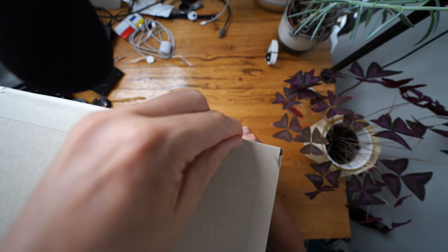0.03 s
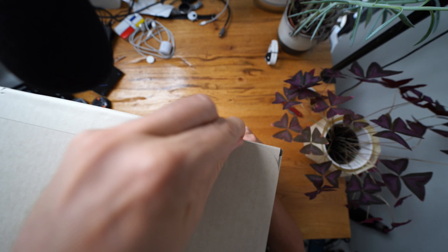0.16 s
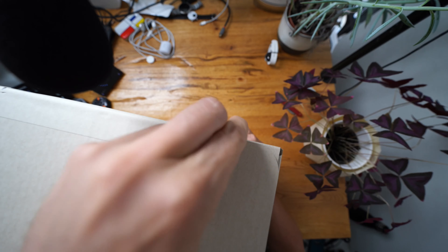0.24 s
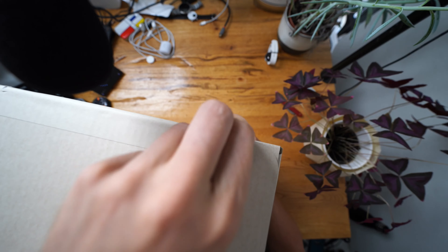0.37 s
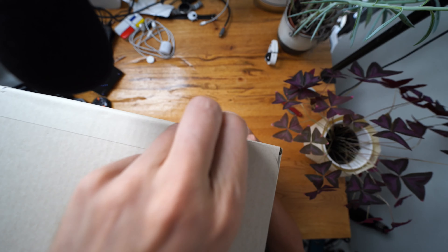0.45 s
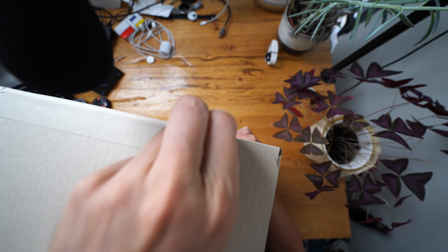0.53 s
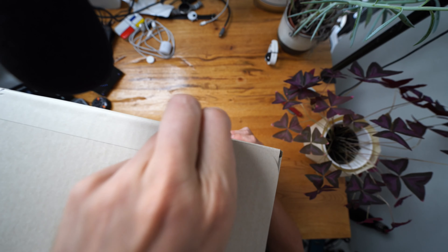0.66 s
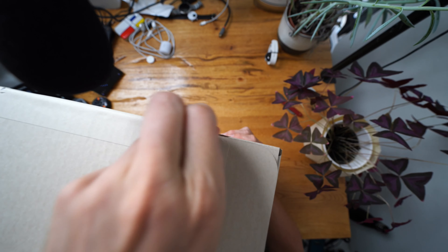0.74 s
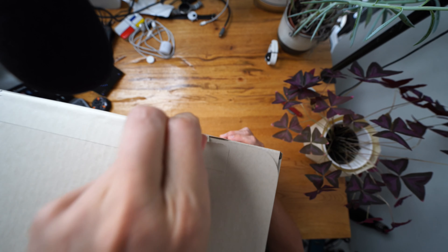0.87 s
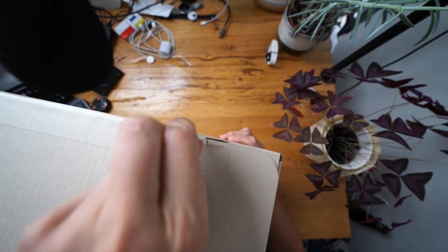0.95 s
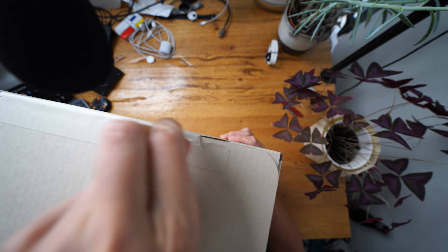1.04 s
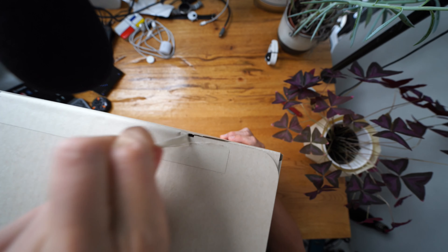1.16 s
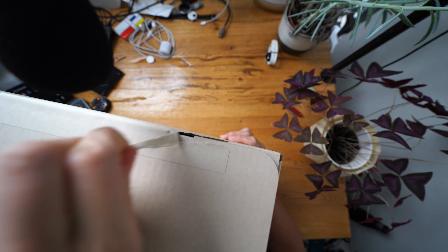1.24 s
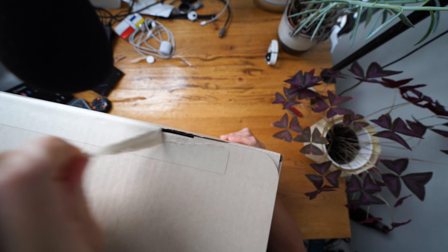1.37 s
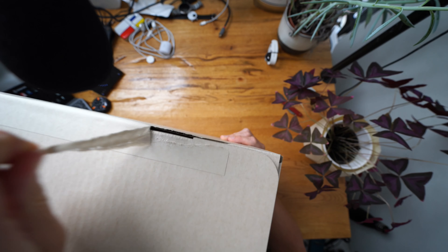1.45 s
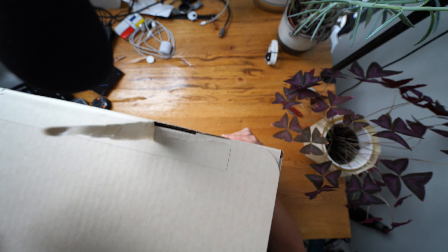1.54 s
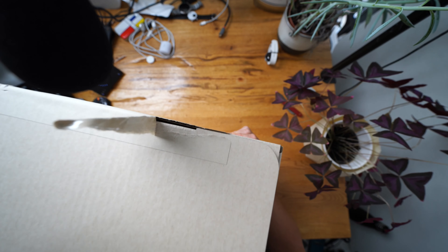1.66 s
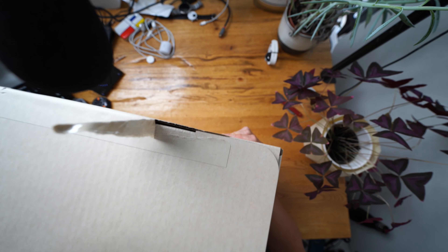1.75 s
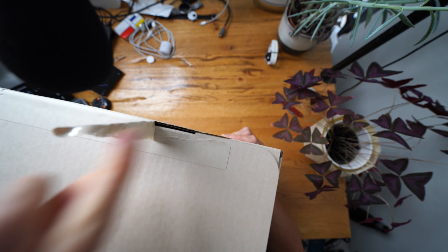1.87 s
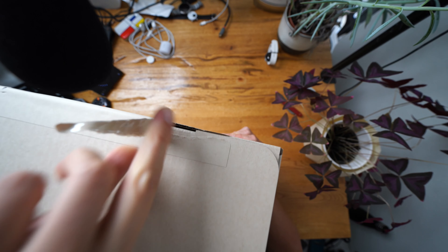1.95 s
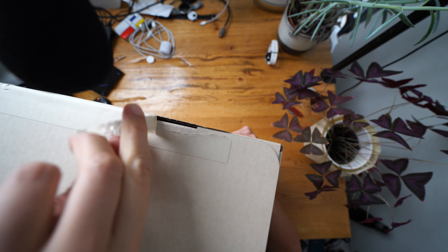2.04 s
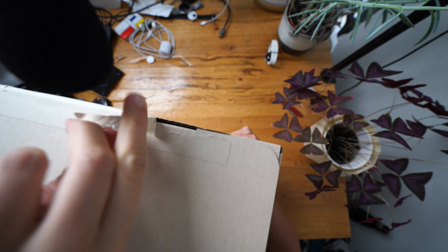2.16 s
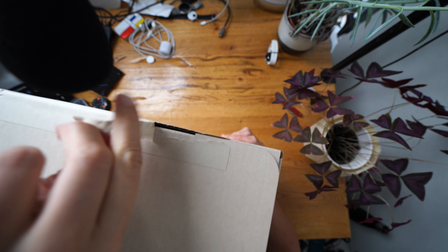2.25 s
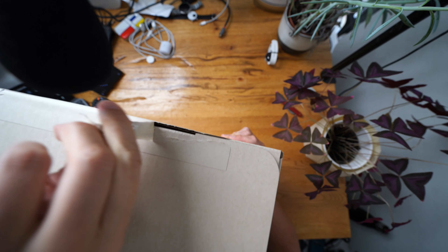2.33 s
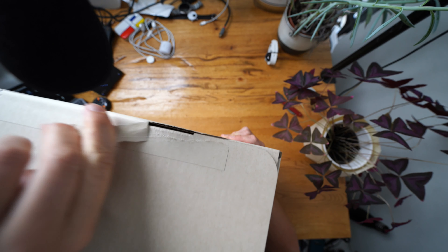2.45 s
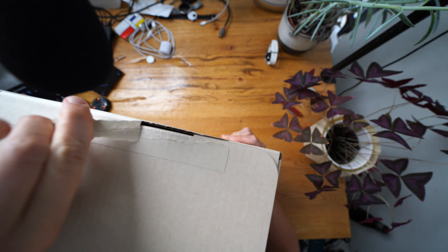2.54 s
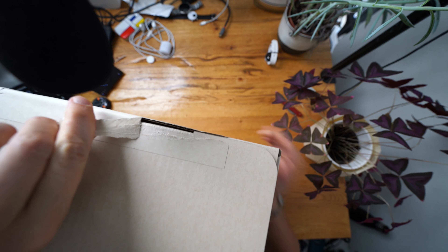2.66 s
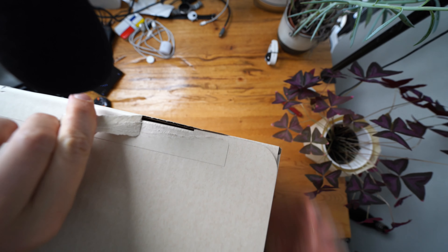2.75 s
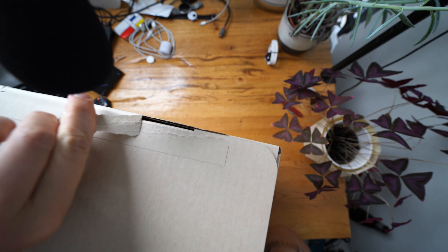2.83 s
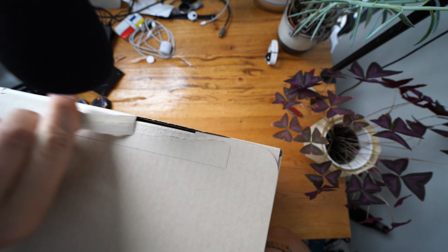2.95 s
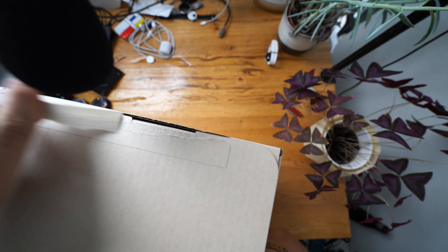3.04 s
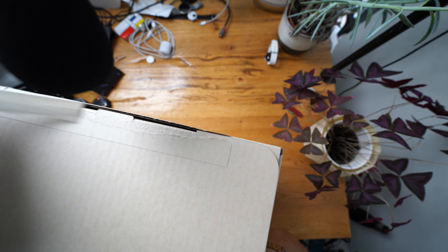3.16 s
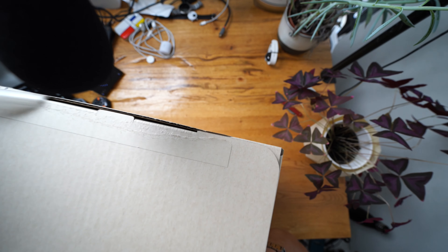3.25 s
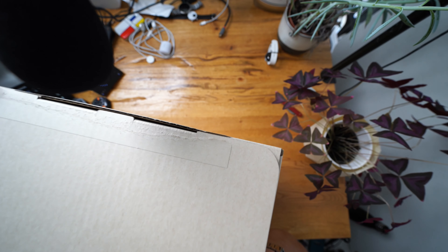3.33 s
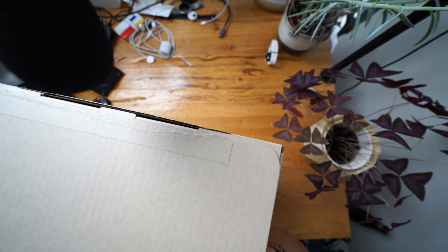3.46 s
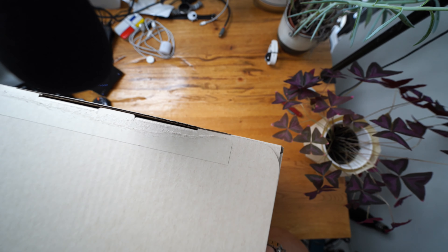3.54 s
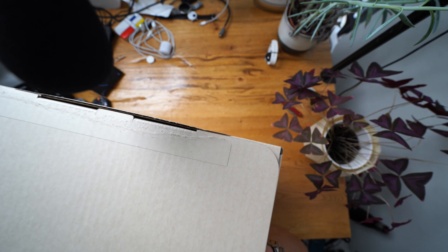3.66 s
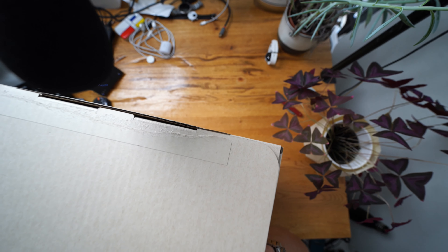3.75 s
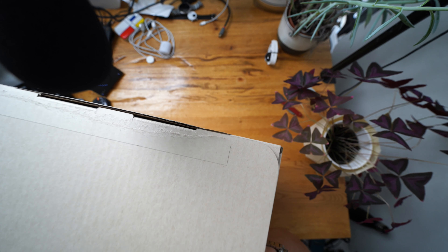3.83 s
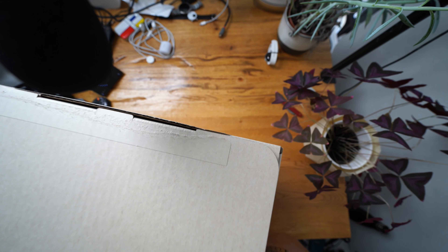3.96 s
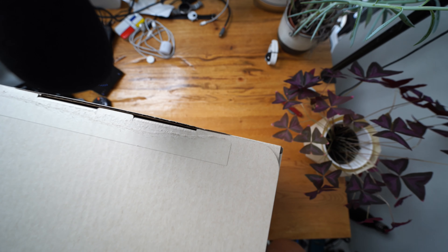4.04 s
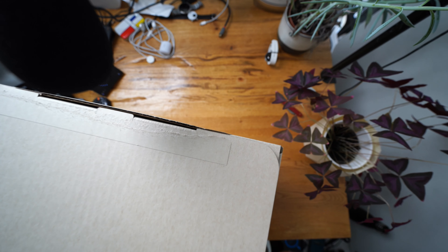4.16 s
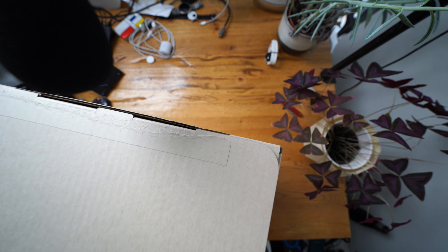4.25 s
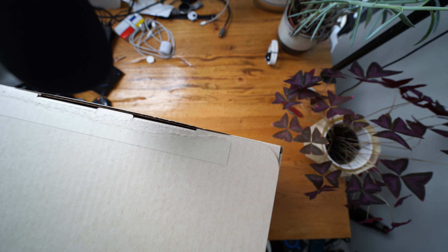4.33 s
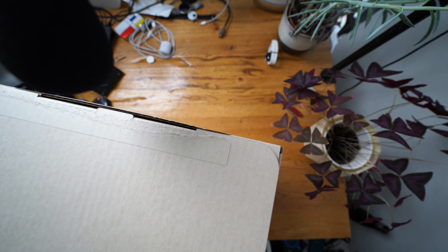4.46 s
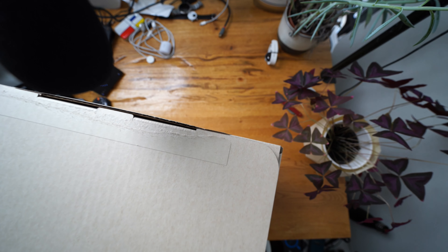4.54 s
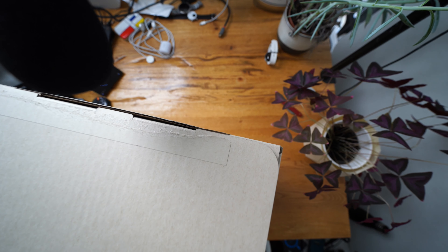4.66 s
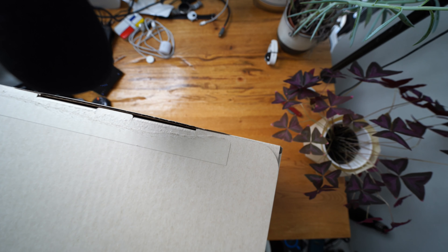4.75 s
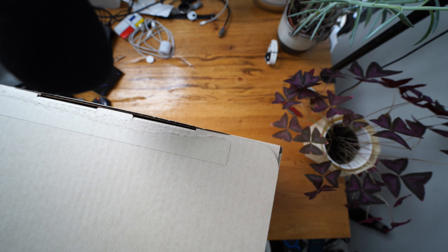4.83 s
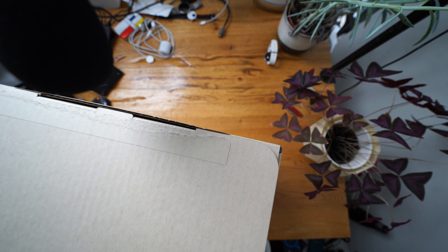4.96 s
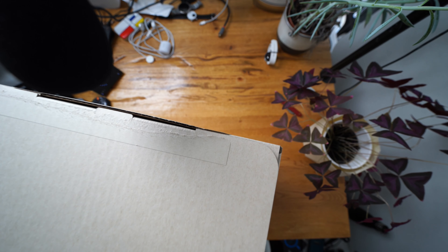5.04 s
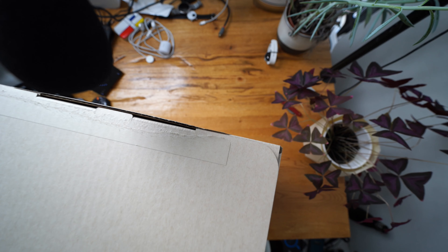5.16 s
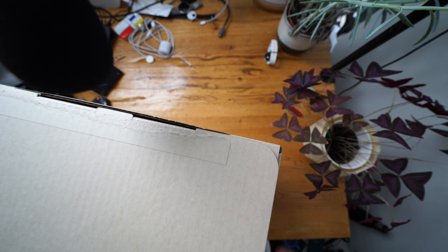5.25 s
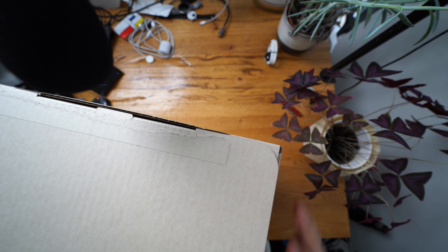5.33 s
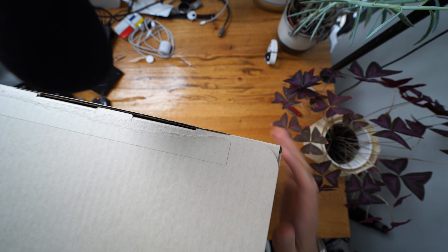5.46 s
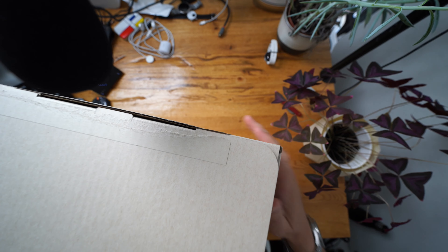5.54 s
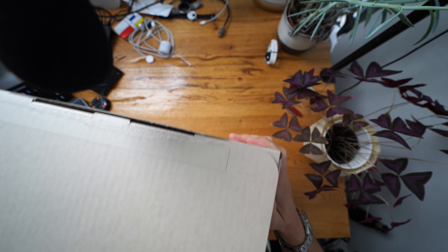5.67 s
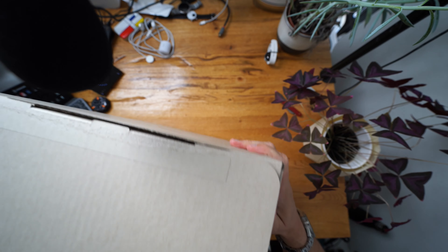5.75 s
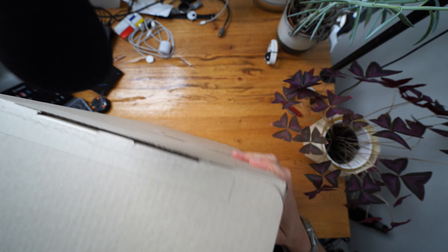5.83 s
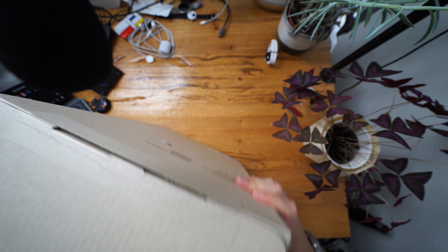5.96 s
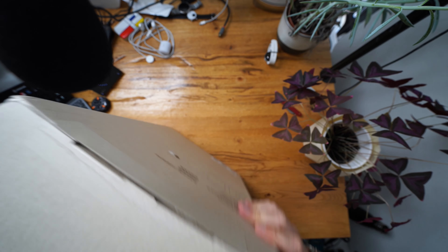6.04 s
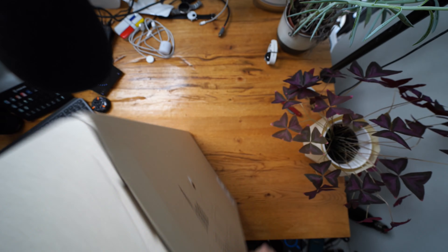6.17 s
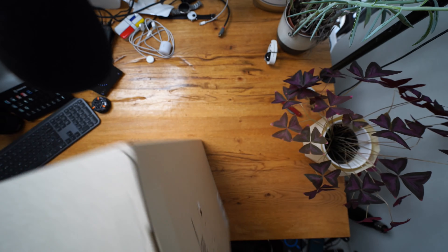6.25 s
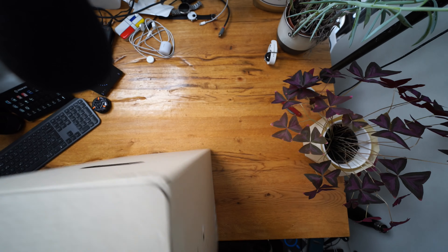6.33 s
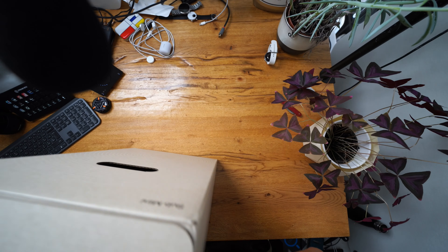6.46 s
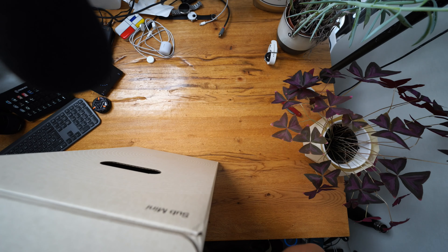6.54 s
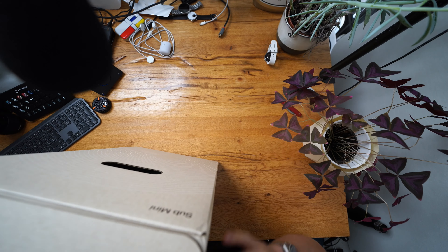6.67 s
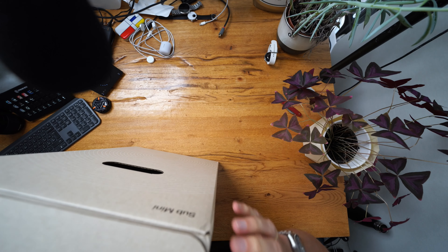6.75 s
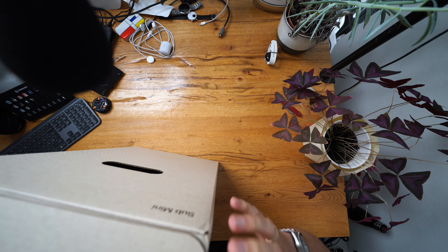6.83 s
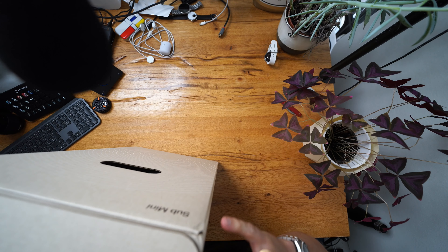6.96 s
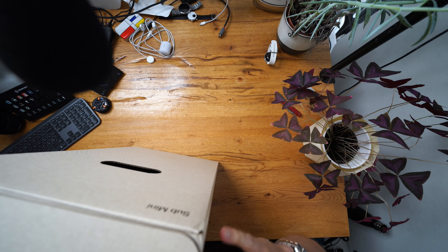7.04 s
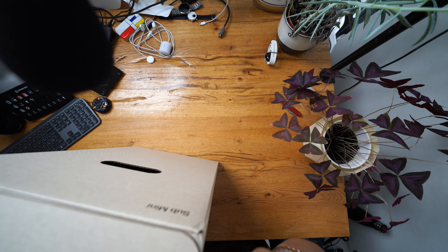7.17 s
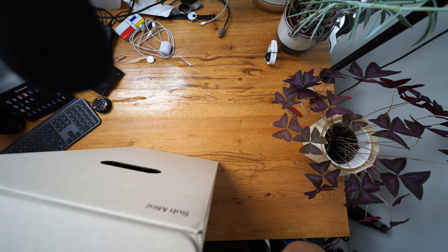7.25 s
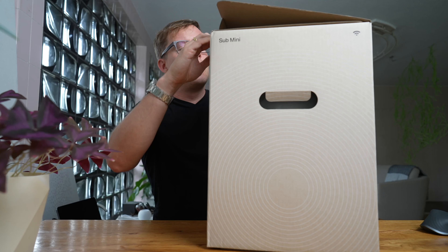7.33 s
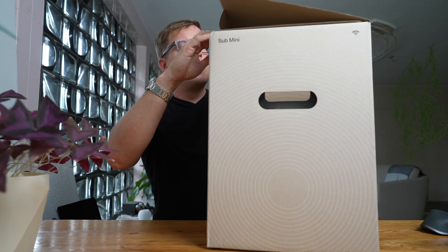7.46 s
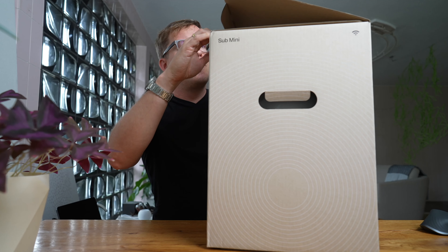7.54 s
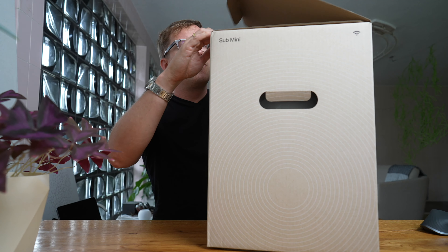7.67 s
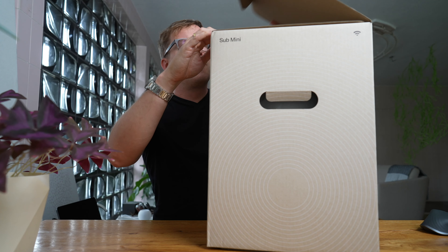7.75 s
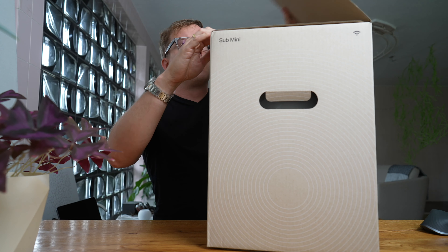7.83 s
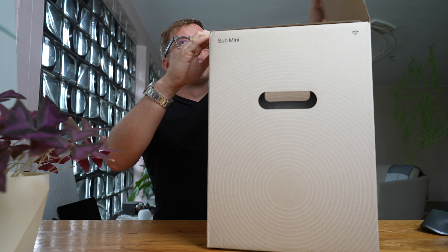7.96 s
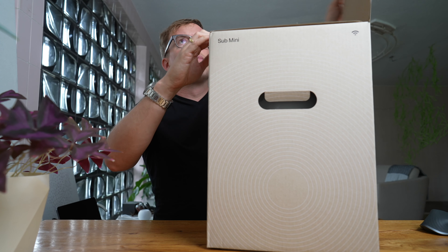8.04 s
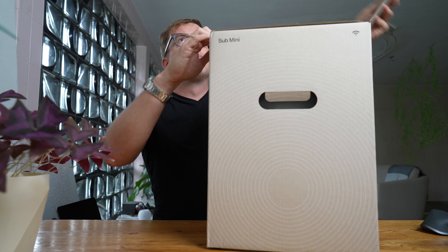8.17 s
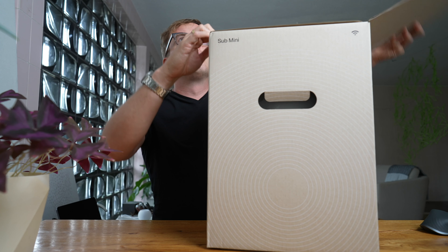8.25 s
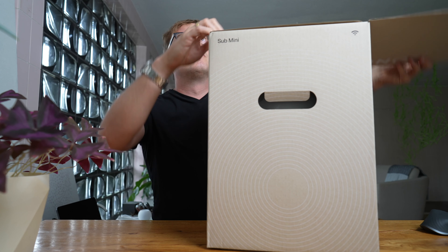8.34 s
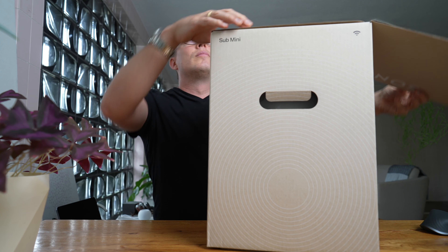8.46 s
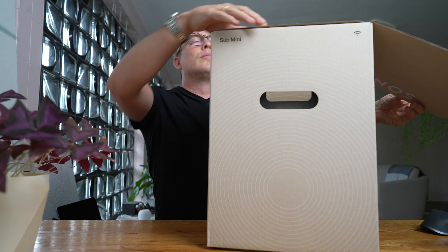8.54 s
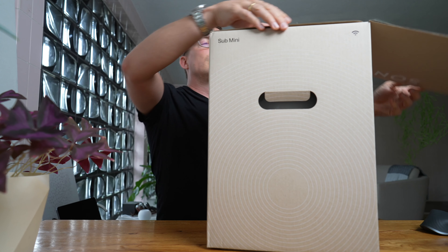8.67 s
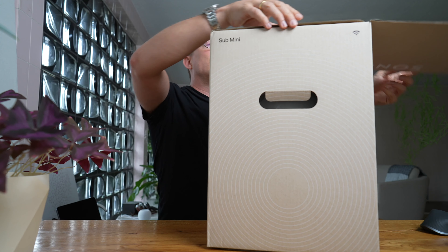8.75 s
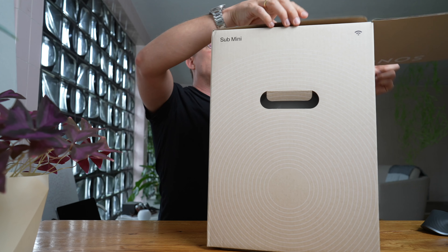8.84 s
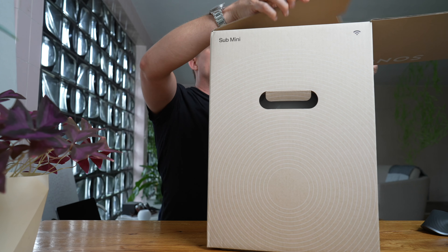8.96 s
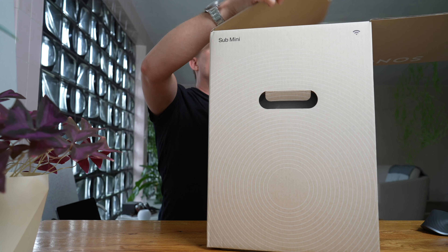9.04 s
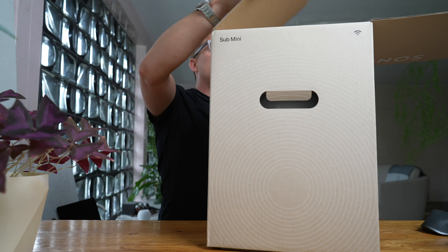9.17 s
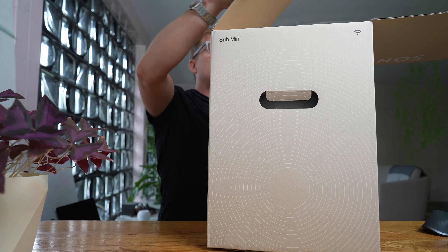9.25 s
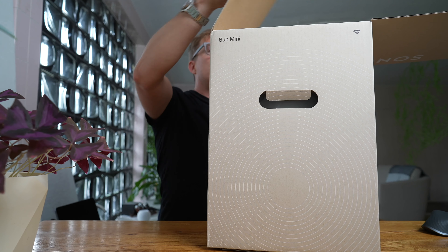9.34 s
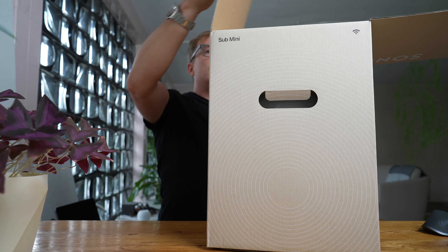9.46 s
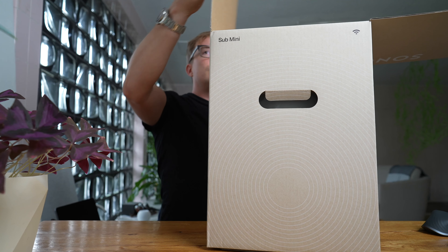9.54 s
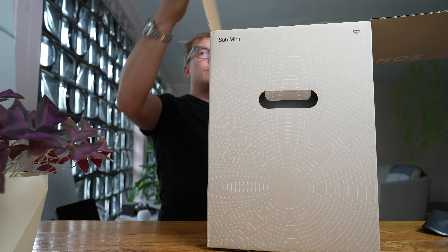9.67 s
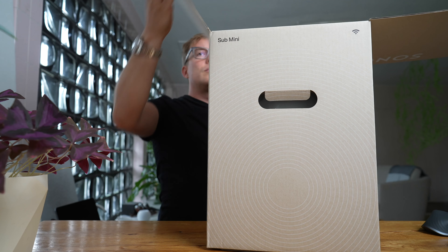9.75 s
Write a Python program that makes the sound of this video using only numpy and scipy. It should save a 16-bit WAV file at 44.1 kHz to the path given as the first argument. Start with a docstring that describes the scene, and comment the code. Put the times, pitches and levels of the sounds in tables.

```python
"""Hands rub and peel at the tear strip of a large cardboard box on a table, close by; then they rip it out.
The strip is dropped some way off. The box is slid round, its lid pops free and hands brush the flaps open.
Rubbing and tearing are showers of random fibre slips, coloured by the board and shaped by the hands' levels.
Snaps, knocks and thumps are damped swings with short bursts; edges, lid, table and landing ring as
resonant noise and decaying modes. A faint room answers the sounds over a steady low murmur."""
import sys
import numpy as np
from scipy import signal
from scipy.fft import rfft, irfft, next_fast_len
from scipy.io import wavfile
from scipy.ndimage import uniform_filter1d, map_coordinates

SR = 44100
rng = np.random.default_rng(int(sys.argv[2]) if len(sys.argv) > 2 else 0)


def unload_wav(signal):
    """Save mono or channel-first audio to the path in sys.argv[1] as 16-bit WAV at rate SR, clipped to [-1, 1]."""
    wavfile.write(
        sys.argv[1],
        SR,
        np.round(np.clip(np.atleast_2d(signal).T, -1, 1) * 32767).astype(np.int16),
    )


N = 432180  # samples, 9.8 s


def amp(db):
    """Amplitude factor of a level in dB."""
    return 10 ** (np.asarray(db) / 20)


def unit(x):
    """x at an RMS of 1."""
    return x / np.sqrt(np.mean(x ** 2) + 1e-20)


def crest(x):
    """x with an envelope peak of 1."""
    return x / np.abs(signal.hilbert(x)).max()


def along(points, hz):
    """Read (Hz, value) points at hz on a log axis."""
    f, v = np.transpose(points)
    return np.interp(np.log(hz + 1), np.log(f + 1), v)


def wobble(rate, size):
    """A smooth random curve with rate knots a second."""
    knots = rng.standard_normal(int(size * rate / SR) + 4)
    return map_coordinates(knots, [np.arange(size) * rate / SR])


def filtered(x, response):
    """x times a response of frequency."""
    m = next_fast_len(len(x) + 8192)
    return irfft(rfft(x, m) * response(np.fft.rfftfreq(m, 1 / SR)), m)[:len(x)]


def band(x, lo_hz, hi_hz, order=2):
    """Causal band-pass."""
    edges_hz = [lo_hz, min(hi_hz, SR / 2 - 100)]
    return signal.sosfilt(signal.butter(order, edges_hz, "band", fs=SR, output="sos"), x)


def below(hz, edge_hz, order=6):
    """Gain of a smooth low-pass."""
    return 1 / (1 + (hz / edge_hz) ** order)


def resonances(modes, hz):
    """Causal response of (Hz, width Hz, dB) modes, alternating in sign."""
    return sum((-1) ** k * amp(db) * 1j * hz * w / (c * c - hz * hz + 1j * hz * w)
               for k, (c, w, db) in enumerate(modes))


def causal(points, size=4096):
    """Minimum-phase impulse response, abrupt at its start, with the gain of (Hz, dB) points."""
    cepstrum = irfft(np.log(amp(along(points, np.fft.rfftfreq(size, 1 / SR)))))
    cepstrum[1:size // 2] *= 2
    cepstrum[size // 2 + 1:] = 0
    return irfft(np.exp(rfft(cepstrum)))


def add(track, s, x):
    """Mix x into the track from time s on."""
    part = track[max(round(s * SR), 0):][:len(x)]
    part += x[:len(part)]


def fading(t, t60):
    """Noise that dies by 60 dB in t60 seconds."""
    return rng.standard_normal(len(t)) * amp(-60 * t / t60)


# Long pulls on the strip, peeling then ripping: time_s, body_db, rasp_db, hiss_db
PEEL_PULL = [(1.055, -38, -43.5, -25.5), (1.351, -41.5, -37.5, -23.5), (1.357, -39.5, -41, -27),
             (1.405, -34.5, -33, -26), (1.419, -32.5, -40.5, -26.5), (1.447, -30, -33.5, -22.5),
             (1.467, -27.5, -40, -28), (1.481, -25, -34, -24), (1.495, -31, -42, -34)]
RIP_PULL = [(2.945, -44, -46.5, -40), (2.965, -30, -37, -25.5), (3.099, -17.5, -26.5, -22),
            (3.173, -21.5, -21.5, -21.5), (3.183, -22.5, -27.5, -23), (3.353, -29.5, -37, -26.5),
            (3.367, -24, -28, -23), (3.391, -32.5, -54.5, -43.5), (3.41, -51, -47, -46)]
# Tone of the board while it peels and rips: freq_hz, relative_density_db (per Hz)
PEEL_COLOUR = [(18, -27), (30, 7.5), (55, 14), (102, -6), (152, 0), (284, -7.5), (500, -8.5), (700, -16.5),
               (1870, -12), (2240, -16.5), (2700, -19), (3400, -20.5), (4300, -24.5), (5800, -23),
               (9190, -19), (13600, -24), (15500, -26.5)]
RIP_COLOUR = [(18, -46), (30, -5.5), (60, 10), (102, 11.5), (237, -1), (432, -10), (492, -9), (787, -16),
              (970, -21), (1400, -19.5), (2070, -24.5), (3490, -29.5), (8500, -24.5), (14000, -29),
              (15500, -39.5)]


def tearing():
    """The strip peels up and rips through the liner: sparse, uneven fibre breaks."""
    peeling = hands((0, 1.96), PEEL_PULL, boom_db=10.5, rasp_db=-4.5)
    ripping = hands((1.96, 4.15), RIP_PULL, boom_db=4.0, rasp_db=-7.5)
    peel = stroke(peeling, PEEL_COLOUR, slips_per_s=3600, spread_db=5.5, smooth_db=-3,
                  catch_rate=130, catch_db=1.9, patchy_db=2.4, breaks_db=-8)
    rip = stroke(ripping, RIP_COLOUR, slips_per_s=4500, spread_db=3.0, smooth_db=0.5,
                 catch_rate=74, catch_db=1.52, patchy_db=0.95, breaks_db=-9.5)
    return peel + rip


# The long slide of the box: time_s, body_db, rasp_db, hiss_db
SLIDE_PULL = [(5.77, -46, -56, -58), (5.848, -44.5, -50, -49.5), (6.25, -42.5, -45, -40),
              (6.504, -41.5, -45.5, -49.5), (6.53, -43, -51, -53)]
# Tone of the turning box and of the brushed flaps: freq_hz, relative_density_db (per Hz)
TURN_COLOUR = [(18, -33), (30, 14), (97, 0), (237, -3.5), (410, -13.5), (575, -6), (728, -14.5),
               (1140, -5.5), (1290, -7), (9190, -8), (12900, -12.5), (15500, -22)]
FLAP_COLOUR = [(18, -33), (30, 11), (90, 10.5), (160, -6.5), (237, -2.5), (332, -17.5), (432, -12.5),
               (591, -18.5), (728, -16.5), (808, -17.5), (1110, -15.5), (1720, -18.5), (2490, -20),
               (4420, -28.5), (8000, -27), (14000, -30), (15500, -34)]


def rubbing():
    """The box slides on the table and palms brush the flaps: dense slips."""
    turning = hands((5.55, 7.16), SLIDE_PULL, boom_db=2.5, rasp_db=-7.5)
    opening = hands((7.16, 9.8), None, boom_db=4.5, rasp_db=-4)
    slide = stroke(turning, TURN_COLOUR, slips_per_s=9000, spread_db=5.5, smooth_db=-0.5,
                   catch_rate=100, catch_db=1.0, patchy_db=2.5)
    brush = stroke(opening, FLAP_COLOUR, slips_per_s=7000, spread_db=1.5, smooth_db=-7,
                   catch_rate=80, catch_db=1.75, patchy_db=2.5)
    return slide + brush


# Edges of the four bands (panel boom, board body, rasp, fibre hiss): edge_hz
BAND_EDGES_HZ = [33, 220, 800, 3800, 20000]


def stroke(rows, colour, slips_per_s, spread_db, smooth_db, catch_rate, catch_db, patchy_db, breaks_db=-40):
    """Fibres catch and let go at random; the slips drive the panels, the board and the bare surface."""
    s, *levels = np.transpose(rows)
    n = round((s[-1] - s[0]) * SR)
    t = s[0] + np.arange(n) / SR
    sizes = amp(spread_db * np.clip(rng.standard_normal(n), -2, 2)) * rng.choice([-1, 1], n)
    slips = unit(sizes * (rng.random(n) < slips_per_s / SR))
    slips = slips + amp(smooth_db) * rng.standard_normal(n)
    # Whole bundles of fibres break at once, on average 130 a second.
    breaks = rng.uniform(-1.2, 1, n) * (rng.random(n) < 130 / SR)
    slips += amp(breaks_db) * unit(breaks)
    clumps = amp(catch_db * wobble(catch_rate, n))
    slips = patchy(slips * clumps, patchy_db)
    sound = np.zeros(n)
    for level_db, lo, hi in zip(levels, BAND_EDGES_HZ, BAND_EDGES_HZ[1:]):
        part = unit(filtered(slips, lambda hz: amp(along(colour, hz)) * below(hz, hi) * (1 - below(hz, lo))))
        # The hand's force evens out the power of the slips over 59 ms.
        power = np.abs(uniform_filter1d(part ** 2, size=2600))
        sound += amp(np.interp(t, s, level_db)) * part / np.sqrt(power + 0.036)
    edge_fade = np.clip(np.minimum(t - s[0], s[-1] - t) / 0.00077, 0, 1)
    track = np.zeros(N)
    add(track, s[0], sound * edge_fade)
    return track


def patchy(x, depth_db):
    """As the contact moves over the board, patches of the spectrum swell and sink."""
    z = signal.stft(x, nperseg=512)[2]
    field = uniform_filter1d(rng.standard_normal(z.shape), size=7, axis=0)
    field = uniform_filter1d(field, size=9, axis=1)
    return signal.istft(z * amp(depth_db * unit(field)), nperseg=512)[1][:len(x)]


# A contact bites before its first level and lets go after its last; the hiss stops sooner than the body.
BITE_S, LET_GO_S, HISS_LET_GO_S = 0.038, 0.069, 0.038
SILENT_DB = 40.5  # drop below the first and last levels at the far ends of bite and release


def swell(s, times, levels_db, release_s):
    """Power at times s of a contact that bites, follows its levels and lets go."""
    knots = np.r_[times[0] - BITE_S, times, times[-1] + release_s]
    db = np.r_[levels_db[0] - SILENT_DB, levels_db, levels_db[-1] - SILENT_DB]
    return amp(np.interp(s, knots, db, left=-200, right=-200)) ** 2


# Short and long rubs and tugs of fingers and palms: start_s, rise_s, fall_s, body_db, hiss_over_body_db
RUBS = [(0.0, .02, 0.064, -44, -6.5), (0.066, 0.026, 0.0079, -36, -3), (0.12, 0.38, .24, -53, 2),
        (0.174, 0.044, 0.023, -45, -0.5), (0.29, 0.021, 0.046, -39.5, -2), (0.36, .03, 0.06, -42.5, -5.5),
        (0.518, 0.015, 0.023, -39, -5.5), (0.674, 0.14, 0.091, -35.5, 2), (0.9, .075, 0.17, -41, 4),
        (1.55, .11, 0.087, -52.5, -8.5), (1.82, 0.022, 0.017, -51, -10),
        (1.983, 0.0064, 0.026, -26.5, -22.5), (2.06, 0.017, 0.046, -60, -14),
        (2.166, 0.016, 0.02, -41.5, -1.5), (2.225, 0.039, 0.022, -51.5, 1),
        (2.28, 0.0066, 0.0069, -43.5, 5), (2.395, .05, 0.012, -46.5, 7), (2.471, 0.053, 0.038, -28.5, 6.5),
        (2.54, 0.033, 0.017, -29.5, -3.5), (2.6, 0.016, 0.091, -44.5, -0.5), (2.73, 0.07, 0.2, -51, 3),
        (2.895, 0.016, 0.034, -37.5, 2), (3.42, 0.0076, .24, -52.5, -2.5), (3.818, 0.017, 0.045, -59, 11),
        (3.9, .04, 0.05, -61.5, 4), (3.985, 0.025, .03, -45, -4.5), (5.585, 0.012, 0.16, -46, -5.5),
        (5.723, 0.01, .04, -46, -3), (6.55, 0.0098, 0.06, -49, -15), (6.707, 0.0074, 0.032, -44.5, -15),
        (6.76, 0.034, 0.13, -61, -18), (6.961, 0.0082, 0.18, -49, -3), (7.175, .015, 0.23, -34.5, -4),
        (7.285, 0.026, 0.024, -23.5, -1.5), (7.345, 0.0095, 0.085, -31, -10.5),
        (7.44, 0.018, 0.017, -37, -2.5), (7.49, 0.023, 0.12, -49.5, -4), (7.639, 0.15, 0.055, -60.5, 12.5),
        (7.848, 0.012, 0.25, -55, 3), (8.15, 0.052, 0.12, -44.5, -5), (8.27, 0.12, 0.036, -49.5, 4.5),
        (8.38, 0.022, 0.057, -36, -6.5), (8.425, 0.051, 0.012, -39.5, 7), (8.555, 0.0048, .08, -53, 14.5),
        (8.64, 0.061, 0.043, -41, 5.5), (8.69, 0.048, 0.058, -33.5, -4), (8.848, 0.012, 0.021, -46, -2.5),
        (8.902, 0.053, 0.036, -40, 4), (8.98, 0.0095, 0.14, -51.5, 3.5), (9.14, 0.26, .24, -59.5, -1),
        (9.529, 0.3, 0.15, -41, -4.5)]
# The panels rumble for as long as a hand holds the box: start_s, length_s, level_db
GRIPS = [(0.0, 0.32, -40), (0.507, 0.74, -36), (1.52, 0.067, -35), (1.872, 0.031, -39), (2.06, 0.27, -33.5),
         (2.375, 0.17, -40), (3.376, 0.058, -35), (3.508, 0.26, -61), (5.602, 0.15, -30), (6.567, .1, -43),
         (6.705, 0.36, -47.5), (7.497, .55, -48), (8.076, 0.071, -34), (8.38, 0.24, -45),
         (8.74, 0.45, -34.5), (9.21, 0.31, -37.5), (9.523, .27, -34)]
SWELL_DB, HISS_SWELL_DB = 7, 7  # rise of a rub from its start to its peak, in the body and in the hiss
RASP_FOLLOWS = 0.47  # share of the hiss level in the rasp of a rub; the rest follows the body
GRIP_FADE_S, GRIP_BODY_DB = 0.057, -22  # release of the rumble; its share in the board's body


def hands(span_s, pull, boom_db, rasp_db):
    """Levels of one action's rubs, grips and pull: rows of time_s, boom_db, body_db, rasp_db, hiss_db."""
    s = np.arange(*span_s, .002)
    body = rasp = hiss = 1e-12  # powers
    for start, rise, fall, db, hiss_db in RUBS:
        times = start + np.cumsum([0, rise, fall])
        eased = np.array([1, 0, 1])
        low = swell(s, times, db - SWELL_DB * eased, LET_GO_S)
        high = swell(s, times, db + hiss_db - HISS_SWELL_DB * eased, HISS_LET_GO_S)
        body, hiss = body + low, hiss + high
        rasp = rasp + amp(rasp_db) ** 2 * low ** (1 - RASP_FOLLOWS) * high ** RASP_FOLLOWS
    if pull is not None:
        times, *levels = np.transpose(pull)
        body, rasp, hiss = (power + swell(s, times, db, HISS_LET_GO_S)
                            for power, db in zip([body, rasp, hiss], levels))
    grip = sum(swell(s, [start, start + length], [db, db], GRIP_FADE_S) for start, length, db in GRIPS)
    boom = body * amp(boom_db) ** 2 + grip
    body = body + grip * amp(GRIP_BODY_DB) ** 2
    return np.column_stack([s, *(10 * np.log10([boom, body, rasp, hiss]))])


# Snaps and knocks of creases, box edge and lid tab, levels are peaks:
# time_s, panel_pitch_hz, thump_db, knock_db, crack_db
SNAPS_AND_KNOCKS = [(1.5115, 89, -1, -3.5, -3), (1.9808, 216, -2.5, -4.7, -21),
                    (2.0056, 165, -18, -16, -26), (2.0146, 170, -32, -15, -45), (2.0457, 163, -8.5, 2, -6),
                    (2.4105, 82.5, -12.5, -33, -12.5), (2.4487, 134, 1.5, -9, -13),
                    (2.5761, 144, -9.5, -12.5, -18), (2.9155, 96.2, -1, -21.5, -11.5),
                    (3.1715, 158, -9, -7, -12), (3.364, 212, -10, -24, 4.5), (3.3729, 179.5, -4, -9, -4.5),
                    (5.598, 114, -46, -21, -30), (5.638, 119, -15.5, -19, -19),
                    (5.729, 159, -21, -21.5, -28), (6.3115, 150, -37, -25, -26),
                    (6.7057, 193, -27, -26.5, -24.5), (6.9624, 258, -18.5, -34, -23),
                    (7.03, 250, -30, -26, -46), (7.1547, 199, -29, -16, -30), (7.17, 217, -13, -4, -3.5),
                    (7.3264, 101, -9, -7, -21)]
# Soft bumps of a hand on a panel: time_s, panel_pitch_hz, thump_db
BUMPS = [(0.659, 140, -17), (0.8993, 154, -13), (0.9569, 160, -15), (2.0308, 156, -17), (2.2803, 68, -11),
         (3.271, 124, -5), (3.795, 160, -33), (4.0076, 132, -20), (7.447, 92, -6.5), (8.289, 69.6, -28),
         (9.1593, 79, -20.5), (9.603, 93, -11.5), (9.631, 69.4, -10)]
BUMP_KNOCK_DB, BUMP_CRACK_DB = -13.5, -22  # against the thump
# Bundles of fibres part with a sharp tick: time_s, crack_db
TICKS = [(0.4394, -15), (0.698, -15), (1.0528, -13), (1.1668, -13), (1.233, -4.5), (1.3244, -0.5),
         (1.3469, -2.5), (1.5607, -26.5), (1.7814, -37.5), (2.071, -26.5), (2.1992, -15), (2.3655, -32.5),
         (2.3877, -20.5), (2.759, -20.5), (2.8934, -16.5), (6.5349, -26), (9.1166, -47)]
TICK_HZ, TICK_THUMP_DB, TICK_KNOCK_DB = 130, -18.5, -19.5  # stirred in the panel, against the crack


def blows():
    """Every snap, knock, bump and tick as time_s, panel_pitch_hz, thump_db, knock_db, crack_db."""
    bumps = [(s, hz, db, db + BUMP_KNOCK_DB, db + BUMP_CRACK_DB) for s, hz, db in BUMPS]
    ticks = [(s, TICK_HZ, db + TICK_THUMP_DB, db + TICK_KNOCK_DB, db) for s, db in TICKS]
    return list(SNAPS_AND_KNOCKS) + bumps + ticks


def snaps(lead_s=0.06, bend_rad=0.1, cycles=4, walls=0.083, walls_t60=0.089, knock_s=0.0011,
          knock_t60=0.022, knock_tail_db=-27, crack_t60=0.014, crack_tail_db=-19):
    """A panel bends under load, lets go with a crack and swings back, losing 60 dB in a few cycles."""
    track = np.zeros(N)
    t = np.arange(SR // 6) / SR
    before = np.arange(-round(lead_s * SR), 0) / SR
    for s, hz, thump_db, knock_db, crack_db in blows():
        load = -np.sin(bend_rad) * np.exp(before * hz * 0.57)
        swing = np.sin(2 * np.pi * hz * t - bend_rad) * amp(-60 * t * hz / cycles)
        boom = walls * unit(band(rng.standard_normal(len(t)), 51.5, 270)) * amp(-60 * t / walls_t60)
        add(track, s - lead_s, amp(thump_db) * crest(np.concatenate([load, swing + boom])))
        # The release is one short push of air with a faint rattle of the flutes.
        push = (1 - t / knock_s / 2) * np.exp(-t / knock_s)
        flutes = unit(band(rng.standard_normal(len(t)), 300, 1800, order=1))
        rattle = amp(knock_tail_db) * flutes * amp(-60 * t / knock_t60)
        add(track, s, amp(knock_db) * crest(band(push + rattle, 110, 4600)))
        crack = band((t == 0) + amp(crack_tail_db) * fading(t, crack_t60), 3000, 11300)
        add(track, s, amp(crack_db) * crest(crack))
    return track


# The bottom edge of the box grinds over the table: time_s, level_db
GRIND = [(6.308, -46), (6.313, -30.5), (6.325, -39), (6.35, -36.5), (6.375, -32.5), (6.41, -28),
         (6.46, -38), (6.51, -32), (6.52, -51)]
# Resonances of the bottom of the box: freq_hz, width_hz, relative_db
BOTTOM_MODES = [(545, 59, 4.5), (850, 120, 1.5), (1140, 140, -2), (1573, 650, -10.5), (2480, 330, -11.5)]


def grinding(slips_per_s=420, spread_db=4, rub_db=-5):
    """The weighted edge sticks and slips at random and rings the bottom of the box."""
    s, db = np.transpose(GRIND)
    slips = (rng.random(N) < slips_per_s / SR) * amp(spread_db * rng.uniform(-0.84, 2.8, N))
    drive = unit(slips) + amp(rub_db) * rng.standard_normal(N)
    ring = band(filtered(drive, lambda hz: resonances(BOTTOM_MODES, hz)), 330, 3070)
    return unit(ring) * amp(np.interp(np.arange(N) / SR, s, db, left=-120, right=-120))


# A flap's edge scrapes over its neighbour: start_s, rise_s, fall_s, level_db
SCRAPES = [(7.3, 0.027, 0.051, -30), (8.385, 0.046, 0.037, -46), (8.69, 0.031, 0.043, -31),
           (8.91, 0.026, 0.016, -56)]
# Resonances of the hollow flap: freq_hz, width_hz, relative_db
FLAP_MODES = [(706, 100, 0.5), (1100, 160, -7.5), (1330, 120, -7.5), (1880, 200, -14)]


def flap_scrapes(slips_per_s=900, rub_db=-3):
    """The cut edge catches on the flutes and rings the flap with a woody rasp."""
    track = np.zeros(N)
    t = np.arange(SR // 3) / SR - BITE_S
    for start, rise, fall, db in SCRAPES:
        power = swell(t, np.cumsum([0, rise, fall]), [db - SWELL_DB, db, db - SWELL_DB], LET_GO_S)
        slips = rng.standard_normal(len(t)) * (rng.random(len(t)) < slips_per_s / SR)
        drive = unit(slips) + amp(rub_db) * rng.standard_normal(len(t))
        ring = band(filtered(drive, lambda hz: resonances(FLAP_MODES, hz)), 380, 2200)
        add(track, start - BITE_S, np.sqrt(power) * unit(ring))
    return track


# The lid's fold creaks in single slips: time_s, peak_db
CREAKS = [(8.046, -32), (8.0839, -25), (8.1083, -21.5), (8.1294, -21), (9.536, -24.5), (9.577, -30),
          (9.597, -25), (9.63, -36), (9.692, -24.5), (9.769, -33)]
# Tone of the hollow lid: freq_hz, relative_gain_db
LID_COLOUR = [(60, -30), (130, 16), (300, 0.5), (600, 0.5), (1300, -11.5), (2000, -25), (3200, -23.5),
              (5000, -35), (15000, -59)]


def creaks(t60=0.097, tail_db=-25):
    """Each slip of the fold raps the hollow lid."""
    track = np.zeros(N)
    t = np.arange(SR // 8) / SR
    lid = causal(LID_COLOUR)
    for s, db in CREAKS:
        rap = (t == 0) + amp(tail_db) * fading(t, t60)
        add(track, s, amp(db) * crest(signal.fftconvolve(rap, lid)))
    return track


def lid_pop(s=7.1695, db=-13, t60=0.022, tail_db=-26, tail_t60=0.36, lo_hz=1900, hi_hz=3400):
    """The lid's tab springs out of its slot: a hard clack with a bright tail in the room."""
    track = np.zeros(N)
    t = np.arange(SR // 2) / SR
    clack = unit(band(rng.standard_normal(len(t)), lo_hz, hi_hz))
    decay = amp(-60 * t / t60) + amp(tail_db - 60 * t / tail_t60)
    add(track, s, amp(db) * clack * decay)
    return track


# The freed lid wobbles like a drumhead, before its unsteadiness: time_s, pitch_hz, level_db
LID_SWING = [(7.265, 55.1, -27), (7.29, 51.7, -11), (7.34, 58.7, -16), (7.408, 51.7, -15.5),
             (7.47, 63, -21), (7.53, 60.6, -35), (7.66, 59, -36), (7.72, 60, -60)]


def lid_wobble(unsteady_db=2):
    """The big lid panel swings to and fro, a little unevenly, and pumps the air."""
    s, hz, db = np.transpose(LID_SWING)
    t = np.arange(N) / SR
    pitch_hz = np.interp(t, s, hz) * (1 + 0.12 * wobble(40, N))
    phase = 2 * np.pi * np.cumsum(pitch_hz) / SR
    level_db = np.interp(t, s, db, left=-120, right=-120) + unsteady_db * wobble(35, N)
    return np.sin(phase) * amp(level_db)


# Something metal on the table, its response applied twice: freq_hz, width_hz, relative_db
METAL_MODES = [(1250, 180, -0.5), (2177, 260, 3)]


def metal_ring(x, db=-40, t60=4.1):
    """The shaken table sets a cluster of slowly dying metal modes ringing."""
    t = np.arange(2 * SR) / SR
    tail = filtered(fading(t, t60), lambda hz: resonances(METAL_MODES, hz) ** 2)
    return amp(db) * signal.fftconvolve(x, tail / np.linalg.norm(tail))[:N]


# The torn strip is let go and lands: time_s, clatter_db, tick_db, t60_s
DROPS = [(4.229, -61, -30.5, 0.017), (4.241, -61, -64, .35), (4.543, -56, -58, 0.77),
         (4.688, -57, -58, 0.57), (4.754, -36.5, -42, 0.16), (4.934, -37.5, -51, 0.079)]
# Resonances of the clatter: freq_hz, width_hz, relative_db
LANDING_MODES = [(259, 87, 7), (450, 74, 8), (778, 130, 5.5), (1210, 140, 3), (1580, 630, -3.5),
                 (2600, 970, -29)]
# Hollow ring of the surface that the strip lands on: freq_hz, relative_db, t60_s
HOLLOW_MODES = [(442, -12, 0.47), (780, -7, .28), (823, -5, 0.18), (1500, -27.5, 0.23)]


def dropped_strip(ring_db=-8):
    """The light strip ticks and clatters on a hard surface, which rings briefly."""
    track = np.zeros(N)
    t = np.arange(SR // 2) / SR
    for s, clatter_db, tick_db, t60 in DROPS:
        clatter = unit(filtered(rng.standard_normal(len(t)), lambda hz: resonances(LANDING_MODES, hz)))
        tick = unit(band(rng.standard_normal(len(t)), 2300, 11200, order=1))
        ring = sum(amp(db - 60 * t / life) * np.sin(2 * np.pi * hz * t + 0.55 * wobble(38, len(t)))
                   for hz, db, life in HOLLOW_MODES)
        contact = amp(clatter_db) * band(clatter, 130, 4200) + amp(tick_db) * tick
        contact = contact * amp(-60 * t / t60)
        onset = 1 - np.exp(-t / 0.00044)
        add(track, s, onset * (contact + amp(clatter_db + ring_db) * ring))
    return track


# Decay of the room: freq_hz, t60_s
ROOM_DECAY = [(80, 0.18), (500, 0.62), (3000, 0.55), (14000, 0.61)]


def room(x):
    """The room's answer, about 7 ms late: a noise tail in which each frequency dies at its own speed."""
    hz, t, z = signal.stft(rng.standard_normal(SR // 2), SR, nperseg=256)
    decay = amp(-60 * t / along(ROOM_DECAY, hz)[:, None])
    tail = signal.istft(z * decay, SR, nperseg=256)[1]
    tail = np.pad(tail, (SR // 150, 0))
    return signal.fftconvolve(x, tail / np.linalg.norm(tail))[:N]


# Tone of the quiet room: freq_hz, relative_density_db (per Hz)
QUIET_COLOUR = [(15, -53), (25, -24), (48, -10.5), (59, -10), (79, -2), (104, -9.5), (173, -14.5),
                (1570, -31.5), (2060, -31), (2420, -32.5), (5730, -38.5), (11800, -41.5), (15500, -54)]


def room_tone(db=-58):
    """Steady low murmur of the air in the room: coloured noise."""
    return amp(db) * unit(filtered(rng.standard_normal(N), lambda hz: amp(along(QUIET_COLOUR, hz))))


def scene():
    """The box is close and nearly dry; the strip lands farther off, with more of the room."""
    box = tearing() + rubbing() + snaps() + grinding() + flap_scrapes()
    box = box + creaks() + lid_pop() + lid_wobble()
    strip = dropped_strip()
    answer = room(amp(-25.5) * box + amp(-1.5) * strip)
    return (box + strip + metal_ring(box) + answer + room_tone())[None]


def record(dry):
    """Cut the deepest bass, round off the highest peaks and stop the treble steeply at 15.55 kHz."""
    heard = filtered(dry[0], lambda hz: 1 - below(hz, 34, order=4))
    held = heard / (1 + np.abs(heard / .85) ** 8) ** (1 / 8)
    return filtered(held, lambda hz: np.sqrt(below(hz, 15550, order=300)))[None]


dry = scene()
out = record(dry)
unload_wav(out)
```